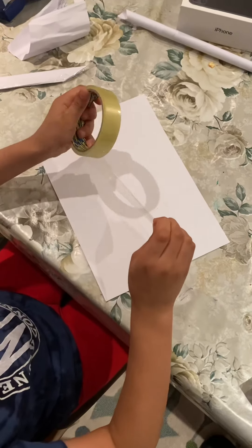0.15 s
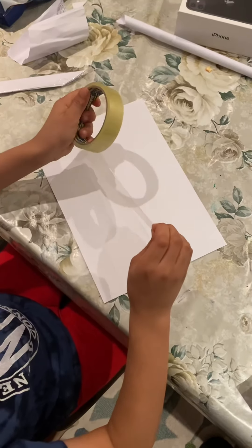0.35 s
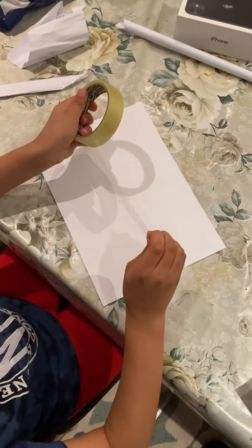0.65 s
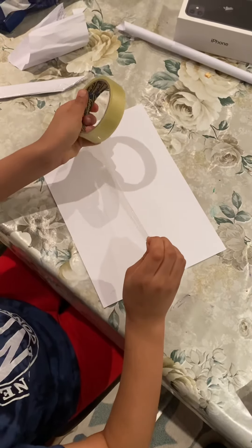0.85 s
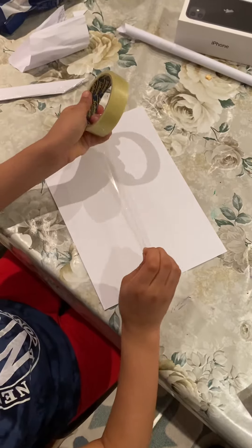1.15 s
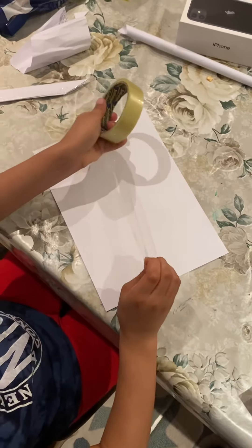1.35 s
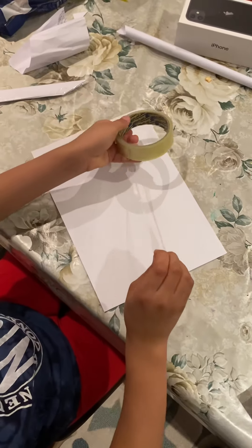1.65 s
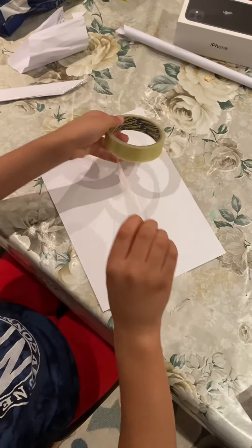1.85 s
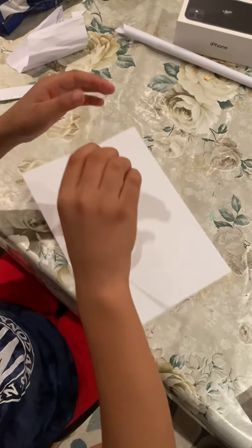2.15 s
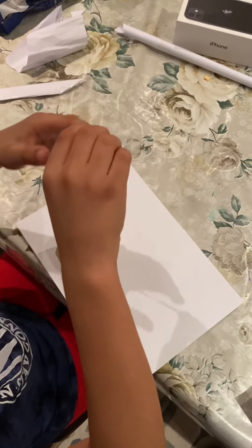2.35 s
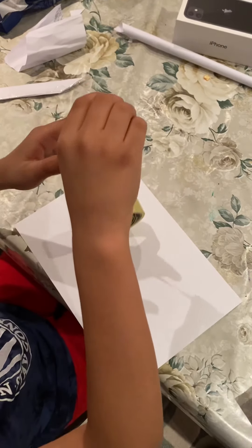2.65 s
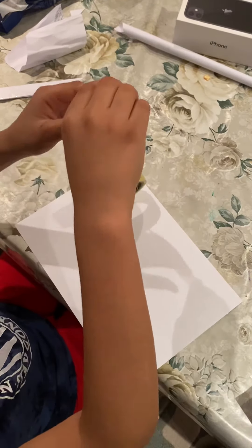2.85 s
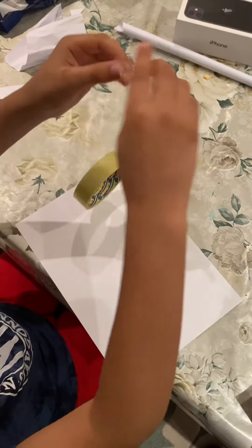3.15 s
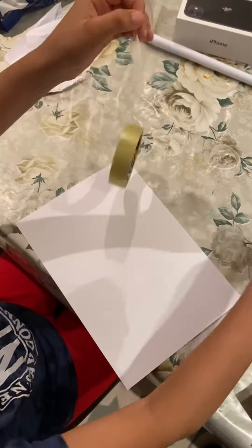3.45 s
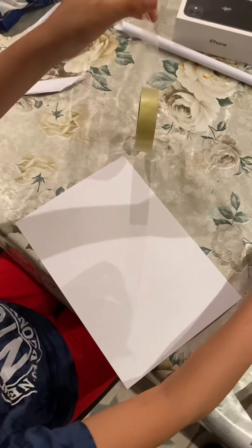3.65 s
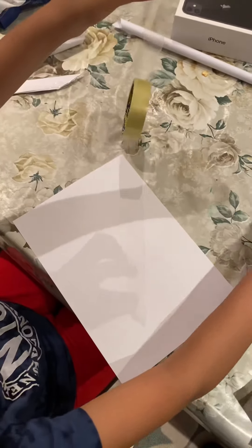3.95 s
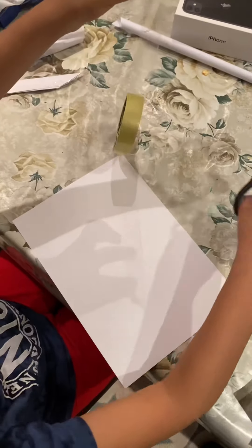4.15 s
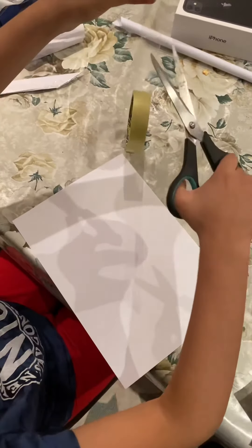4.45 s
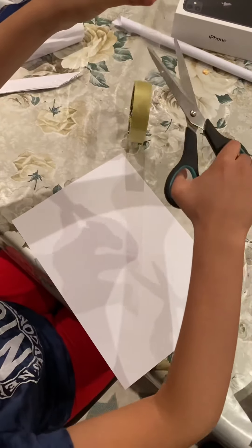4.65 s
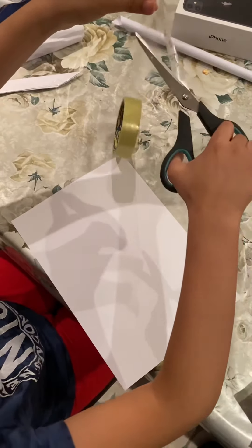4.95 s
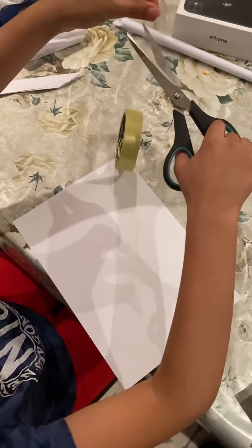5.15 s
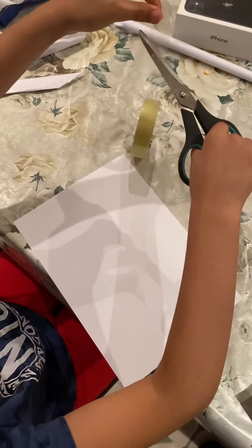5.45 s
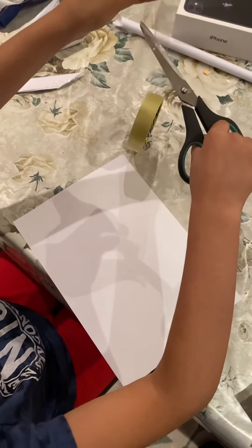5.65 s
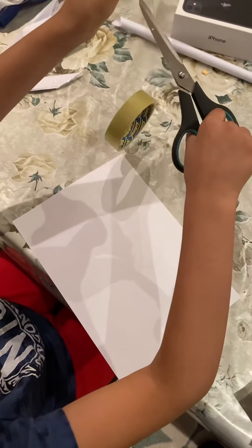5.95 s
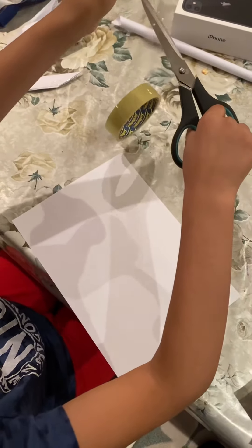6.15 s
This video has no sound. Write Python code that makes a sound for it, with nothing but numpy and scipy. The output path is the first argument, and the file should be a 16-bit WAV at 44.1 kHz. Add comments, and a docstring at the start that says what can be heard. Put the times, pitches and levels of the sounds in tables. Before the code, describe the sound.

Loud, jerky crackles of tape being unrolled, followed by a small bounce, light paper rustling and scattered clicks at a table indoors.

```python
"""Sticky tape is pulled off its roll above a table: for just over a second, stick-slip friction frees it
in short ripping jerks. The strip comes unstuck from a finger and rings, then the roll drops on a paper
sheet and bounces. Paper, sleeves and scissors rustle and click, with one soft knock on the table, and near
the end the strip is plucked twice more. All the while a quiet furnished room rumbles and hums, heard by
a nearby phone whose two microphone ports receive the treble at different delays."""
import sys
import numpy as np
from scipy import signal
from scipy.fft import rfft, irfft, next_fast_len
from scipy.io import wavfile
from scipy.ndimage import uniform_filter1d, map_coordinates

SR = 44100
rng = np.random.default_rng(int(sys.argv[2]) if len(sys.argv) > 2 else 0)


def to_wav(sig):
    """Store sig (one row per channel, or 1-D mono) as 16-bit WAV at the path in sys.argv[1].

    Samples outside -1..1 are clipped; the rate is SR.
    """
    pcm = np.clip(np.atleast_2d(sig), -1, 1) * 32767
    pcm = np.round(pcm).astype(np.int16)
    wavfile.write(sys.argv[1], SR, pcm.T)  # frames by channels


N = 277389
SPAN = N + SR  # samples, with a margin at both ends
EARLY_S, PAD = 0.2, 256  # margin before time zero; samples left ahead of each event for its filters
MS = np.arange(4096) / SR * 1000  # time within one event


def amp(db):
    """Amplitude ratio of a level in decibels."""
    return 10 ** (np.asarray(db) / 20)


def unit(x):
    """Normalisation to an rms of 1."""
    return x / np.sqrt(np.mean(x ** 2) + 1e-20)


def along(points, hz):
    """Interpolation of (freq_hz, value) points on a logarithmic axis."""
    freqs, values = np.transpose(points)
    return np.interp(np.log(hz + 1), np.log(freqs + 1), values)


def curves(rows):
    """Linear envelopes, one for each column after the time."""
    times, *columns = np.transpose(rows)
    return [np.interp(np.arange(N) / SR, times, column) for column in columns]


def wobble(rate_hz):
    """Random modulation: a spline through Gaussian knots."""
    knots = rng.standard_normal(int(N * rate_hz / SR) + 4)
    return map_coordinates(knots, [np.arange(N) * rate_hz / SR])


def filtered(x, response):
    """Linear filtering: the spectrum times a frequency response."""
    size = next_fast_len(N + SR // 2)
    return irfft(rfft(x, size) * response(np.fft.rfftfreq(size, 1 / SR)), size)[..., :N]


def resonances(modes):
    """Superposed resonators (pitch_hz, width_hz, gain_db) of alternating sign."""
    return lambda f: sum((-1) ** k * amp(db) * 1j * f * width / (hz * hz - f * f + 1j * f * width)
                         for k, (hz, width, db) in enumerate(modes))


def colour(points):
    """Zero-phase response through (freq_hz, gain_db) points."""
    return lambda f: amp(along(points, f))


# Likeness of the two ports in diffuse sound: freq_hz, coherence
DIFFUSE_FIELD = [(60, 0.98), (250, .9), (700, 0.12), (2000, 0.94), (3200, 0.39), (7000, 1), (9000, 1),
                 (10500, 1), (12000, 1), (13600, 0.96), (16000, .7)]

def stereo(pair, coherence=DIFFUSE_FIELD):
    """Partial coherence: two independent signals mix as mid and side into left and right."""
    angle = lambda hz: np.arccos(np.clip(along(coherence, hz), -1, 1)) / 2
    mid, side = filtered(pair, lambda hz: np.array([np.cos(angle(hz)), np.sin(angle(hz))]))
    return np.array([mid + side, mid - side])


# Low room noise, raised at first by the lingering low echo of the tape rips: time_s, rumble_db, low_db
ROOM_LEVELS = [(0.0, -64.5, -56), (0.47, -67, -57.5), (0.89, -80, -60), (1.55, -78.5, -68),
               (1.85, -62.5, -66), (2.4, -74, -67), (3.25, -73, -66.5), (3.4, -69.5, -66),
               (4.0, -68.5, -67.5), (4.4, -79.5, -67), (6.29, -78.5, -67.5)]
# Spectra of deep rumble, low room noise and microphone hiss: freq_hz, gain_db
RUMBLE_SPECTRUM = [(12, -56.5), (20, -28), (25, -12), (38, -4), (70, -4), (90, -0.5), (120, -30),
                   (200, -120)]
LOW_SPECTRUM = [(41, -30.5), (70, -5.5), (123, -3.5), (155, -4.5), (178, -6.5), (371, -13.5), (559, -21),
                (588, -32.5), (898, -32.5), (1500, -41.5), (1950, -77.5), (3300, -120)]
HISS_SPECTRUM = [(800, 9), (2000, -6.5), (6000, -8), (12000, -14), (16000, -15.5), (16500, -52.5)]
# A distant appliance: pitch_hz, level_db
HUM_PARTIALS = [(48.4, -72), (96.9, -72), (150.7, -72)]
# Swells of a low drone: time_s, level_db
DRONE_LEVELS = [(1.45, -82.5), (1.7, -61.5), (2.05, -55.5), (2.2, -66), (2.55, -70.5), (3.2, -85),
                (3.4, -58.5), (3.55, -70.5), (3.9, -81)]

def room_noise():
    """Diffuse field: coloured noise with a hum and a drone that drift in amplitude and phase."""
    t = np.arange(N) / SR
    rumble_db, low_db = curves(ROOM_LEVELS)
    noise = lambda spectrum: unit(filtered(rng.standard_normal((2, N)), colour(spectrum)))
    rumble = amp(rumble_db + 1.2 * wobble(3.9)) * noise(RUMBLE_SPECTRUM)
    low_noise = amp(low_db + 0.98 * wobble(19)) * noise(LOW_SPECTRUM)
    hum = sum(amp(db + 1.8 * wobble(1.9)) * np.sin(2 * np.pi * hz * t + 1.3 * wobble(1.6))
              for hz, db in HUM_PARTIALS)
    drone_db = curves(DRONE_LEVELS)[0] + 0.8 * wobble(5)
    drone = amp(drone_db) * np.sin(2 * np.pi * 58 * t + 1.5 * wobble(3.8))
    hiss = amp(-81) * noise(HISS_SPECTRUM)
    return stereo(rumble + low_noise + hiss) + hum + drone


# Decay of reflections from the table top and close things, and from the walls: freq_hz, t60_s
NEAR_DECAY = [(200, 0.23), (1500, 0.15), (5000, 0.08), (14000, 0.021)]
WALL_DECAY = [(200, 0.94), (1000, 0.62), (4000, 0.56), (14000, 0.22)]

def reflections(x, decay, delay_ms, hop_s=0.041):
    """Reverberation: each band decays exponentially; moving hands give every hop its own echo pattern."""
    out = np.zeros((2, SPAN + SR))
    hop, delay = round(hop_s * SR), round(delay_ms * SR / 1000)
    for start in range(0, SPAN, hop):
        part = x[start:start + hop]
        if np.abs(part).max() < 1e-5:
            continue
        hz, t, bands = signal.stft(rng.standard_normal((2, SR // 2)), SR, nperseg=256)
        tail = signal.istft(bands * amp(-60 * t / along(decay, hz)[:, None]), SR, nperseg=256)[1]
        wet = signal.fftconvolve(part[None], unit(tail) / np.sqrt(tail.shape[1]), axes=1)
        out[:, start + delay:][:, :wet.shape[1]] += wet
    return out[:, :SPAN]


# Paper and sleeves sliding: time_s, dull_db, bright_db
RUSTLE_LEVELS = [(1.3, -74.5, -69.5), (1.94, -71.5, -75.5), (2.04, -58.5, -61), (2.29, -68.5, -64.5),
                 (2.485, -80.5, -91.5), (2.5, -65, -67.5), (2.7, -71, -73), (3.55, -68, -73),
                 (3.68, -83, -87), (3.9, -81, -82), (4.29, -101, -96.5), (4.32, -82, -87),
                 (4.59, -82, -78.5), (4.7, -98, -91.5), (4.9, -94, -91), (4.92, -70, -64),
                 (5.16, -75.5, -73), (5.32, -67.5, -67), (5.48, -90, -94.5), (5.52, -81, -76),
                 (5.9, -97, -98), (6.29, -93, -90)]
# Their dull rub and bright hiss: freq_hz, gain_db
DULL_SPECTRUM = [(300, 9.5), (800, -5), (1500, -0.5), (3000, 4.5), (5500, 3), (9000, -24.5), (16000, -27)]
BRIGHT_SPECTRUM = [(1500, -41), (3000, -7), (6000, -2), (9000, 5), (12000, 2.5), (15700, -3), (16200, -45)]

def rustle(ticks_per_s=40, tick_db=13):
    """Sliding friction: fibres make clumps of noise in shifting patches of colour, with sparse ticks."""
    dull_db, bright_db = curves(RUSTLE_LEVELS)
    moving = np.arange(N) > RUSTLE_LEVELS[0][0] * SR
    bands = signal.stft(rng.standard_normal((2, N)), nperseg=256)[2]
    patches = uniform_filter1d(rng.standard_normal(bands.shape[1:]), size=4, axis=0)  # across frequency
    patches = uniform_filter1d(patches, size=14, axis=1)  # across time
    patchy = signal.istft(bands * amp(2.6 * unit(patches)), nperseg=256)[1][:, :N]
    ticks = (rng.random(N) < ticks_per_s / SR) * amp(tick_db + 3.9 * rng.standard_normal(N))
    clumps = amp(1.33 * wobble(5) + 0.86 * wobble(10) + 0.91 * wobble(170))
    grains = patchy * (clumps + ticks)
    dull = amp(dull_db) * unit(filtered(grains, colour(DULL_SPECTRUM)))
    bright = amp(bright_db) * unit(filtered(grains, colour(BRIGHT_SPECTRUM)))
    return stereo(moving * (dull + bright))


# A soft knock on the table; the roll landing on the sheet and bouncing: start_s, level_db
TABLE_KNOCKS = [(3.587, -35)]
ROLL_LANDINGS = [(2.003, -39.5), (2.094, -45)]
# Modes of the table and of the roll's core: pitch_hz, gain_db, t60_s
TABLE_MODES = [(115.6, -8, 0.19), (247.2, -3.5, 0.038), (470.6, 2, 0.028), (709, 6.5, 0.017)]
CORE_MODES = [(326, 8.5, 0.018), (458, 5, 0.023), (566, 8.5, 0.013)]

def thuds(strikes, modes, attack_s):
    """Free vibration: a soft impact excites modes that ring as damped sinusoids."""
    out, t = np.zeros(SPAN), np.arange(SR // 4) / SR
    tone = sum(amp(db - 60 * t / t60) * np.sin(2 * np.pi * hz * t) for hz, db, t60 in modes)
    onset = 1 - np.exp(-t / attack_s)
    for start_s, db in strikes:
        out[round((start_s + EARLY_S) * SR) + PAD:][:len(t)] += amp(db) * tone * onset
    return out


def add_volley(out, start_s, envelope, paths, spread_db=3.5):
    """Source and filter: tiny fractures of uneven size sound through each (level_db, response) path."""
    cracks = rng.standard_normal((2, len(MS)))  # two rows, as the contact is a line
    cracks *= amp(spread_db * rng.standard_normal(len(MS)))
    force = rfft(np.roll(envelope * cracks, PAD, axis=1))
    hz = np.fft.rfftfreq(len(MS), 1 / SR)
    for db, response in paths:
        sound = irfft(force * response(hz), len(MS))
        gain = amp(db) * np.linalg.norm(envelope) / np.linalg.norm(sound, axis=1, keepdims=True)
        out[:, round((start_s + EARLY_S) * SR):][:, :len(MS)] += gain * sound


def snap(length_ms, rise_ms, sag, fade_ms, overshoot=0):
    """Transient envelope: a sudden rise with optional overshoot, a sagging hold, an exponential end."""
    rise = 1 - np.exp(-MS / rise_ms)
    hold = np.exp(-sag * np.minimum(MS / length_ms, 1))
    fade = np.exp(-np.maximum(MS - length_ms, 0) / fade_ms)
    return rise * hold * fade * (1 + overshoot * np.exp(-MS / 0.7))


# A hard contact: freq_hz, gain_db
CLICK_SPECTRUM = [(500, -26.5), (1000, -6), (1600, -9.5), (2500, -1), (3600, -2), (5000, 3.5), (7000, 0.5),
                  (15700, 0), (17000, -35.5)]

def tilted(db_per_octave):
    """Spectral tilt: a broadband click made brighter or duller about 5 kHz."""
    return lambda f: amp(along(CLICK_SPECTRUM, f) + db_per_octave * np.log2(np.clip(f, 1800, 14000) / 5000))


# Short rubs: start_s, level_db, tilt_db_per_octave, knock_gain_db, length_ms, body_hz, body_gain_db
RUBS = [(1.99, -51.5, -5, -16, 31, 2030, -3), (2.016, -45, -3, -37, 32, 3640, -9),
        (2.078, -50, 6, -16, 24, 5100, -5), (2.09, -54.5, 3, -10, 20, 1900, -2.5),
        (2.545, -50.5, -3.5, -4.5, 41.6, 1523, -9), (3.011, -60, -10, -18, 25, 3060, -4),
        (3.122, -53, -6, -12.5, 36, 4510, -8), (3.855, -66.5, -7, -4.5, 23, 5050, -7),
        (3.873, -62.5, -1, -4.5, 32.5, 2175, -4), (4.395, -60, 8.5, -26, 51.3, 2290, 1),
        (4.93, -56, 10, -28, 83, 5000, -9), (5.08, -48, 0.2, -20.5, 23.4, 7000, -6),
        (5.095, -53, 4, -5.5, 13.3, 3880, -3), (5.315, -47, 5, -31, 27, 2490, -6)]
# The roll in the hand: pitch_hz, width_hz, gain_db
ROLL_MODES = [(239.6, 53, -3), (440, 500, -3), (719, 280, -0.5), (952.2, 51, 1.5)]

def scuffs(peak_share=0.35, fade_share=0.25):
    """Frictional excitation: a rub swells and stutters, driving resonances of the rubbed body and roll."""
    out = np.zeros((2, SPAN))
    for start_s, db, tilt, knock_db, length_ms, body_hz, body_db in RUBS:
        progress = MS / length_ms
        swell = np.minimum(progress / peak_share, 1) ** 1.6
        fade = np.exp(-np.maximum(progress - peak_share, 0) / fade_share)
        stutter = amp(4 * unit(uniform_filter1d(rng.standard_normal(len(MS)), size=60)))  # grip and release
        body = resonances([(body_hz, 0.16 * body_hz, 0)])
        paths = (db, tilted(tilt)), (db + body_db, body), (db + knock_db, resonances(ROLL_MODES))
        add_volley(out, start_s, swell * fade * stutter, paths)
    return out


# Contacts of tape, paper and scissors: start_s, level_db, tilt_db_per_octave
CONTACTS = [(1.4652, -45.5, -3.5), (2.0031, -38, -10), (2.0234, -34, 2.5), (2.029, -30, 6),
            (2.4985, -50, -3), (2.5598, -38, -1.5), (2.922, -49.5, -7), (2.9498, -52.5, -16.5),
            (3.0133, -41, -7.5), (3.1351, -36, 3), (3.4186, -43, -5), (3.459, -45, 4), (3.5475, -47, -9.5),
            (3.7103, -48, 1), (3.9561, -50.5, 4), (4.0991, -58, -3), (4.306, -60.5, -6.5),
            (4.415, -47, 5.5), (4.7857, -49, 2), (4.803, -48, -5), (4.914, -65, 2.2), (5.053, -45.5, 2),
            (5.089, -41.5, -1.5), (5.1715, -49, -11.5), (5.2112, -42.5, 11), (5.2465, -51.5, 7),
            (5.2768, -47, -1.3), (5.285, -49, 5), (5.297, -40.5, -3.5), (5.3122, -27.5, -1.3),
            (5.3313, -35, -6), (5.534, -45.5, 14), (5.7329, -48.5, -6.1), (5.968, -57, -4.5)]
# The strip comes unstuck from a finger: start_s, level_db, tilt_db_per_octave, ring_gain_db
STRIP_PLUCKS = [(1.6258, -24, 3.5, -2), (5.5716, -34.5, -2, -5), (6.2363, -25, -1.5, -7)]
# The stretched strip near the peel line: pitch_hz, width_hz, gain_db
FILM_MODES = [(2477, 470, 8.5), (5700, 700, 8.5)]

def clicks(contact_ring_db=-15.5):
    """Impulsive excitation: a brief contact or pluck clicks, rings the strip and knocks the roll."""
    out = np.zeros((2, SPAN))
    envelope = snap(1.5, rise_ms=0.14, sag=1.2, fade_ms=0.99)
    for start_s, db, tilt, ring_db in [(*row, contact_ring_db) for row in CONTACTS] + STRIP_PLUCKS:
        knock_db = -62 + 0.4 * (db + 42)  # grows more slowly than the click
        paths = (db, tilted(tilt)), (db + ring_db, resonances(FILM_MODES)), (knock_db, resonances(ROLL_MODES))
        add_volley(out, start_s, envelope, paths)
    return out


# Ticks of the glue edge: start_s, level_db
GLUE_TICKS = [(0.593, -34), (.622, -51.5), (.632, -44.5), (0.639, -34.5), (1.0146, -34), (1.021, -44.5),
              (1.029, -48), (1.042, -41)]

def glue_ticks():
    """Acoustic emission: the loaded glue edge ticks just before it lets go."""
    out = np.zeros((2, SPAN))
    envelope = snap(0.4, rise_ms=0.15, sag=0.3, fade_ms=0.6)
    for start_s, db in GLUE_TICKS:
        add_volley(out, start_s, envelope, [(db, tilted(4))])
    return out


# Slips of the peel front, the first heard only as its echo: start_s, level_db, length_ms
PEEL_SLIPS = [(-0.15, -5.5, 15), (0.019, -18, 5.5), (0.0307, -18, 2), (0.0337, -20, 5.7),
              (0.0459, -13, 4.2), (0.0594, -19, 7.6), (0.0745, -10.5, 3.1), (0.079, -17.5, 2.3),
              (0.0878, -15, 5.9), (0.1445, -17, 3.8), (0.2314, -15.5, 3.8), (0.2353, -17.5, 6.1),
              (0.2418, -17.5, 1.9), (0.2456, -16, 2.7), (0.2494, -18, 2.8), (0.3272, -16, 5),
              (0.3386, -10, 2.7), (0.4336, -12.5, 2.13), (0.4369, -15, 1.24), (0.4449, -16, 2.6),
              (0.6498, -14.5, 1.8), (0.6529, -14.5, 2.17), (0.6598, -14, 4.4), (0.8279, -15, 2.9),
              (0.8408, -12, 2.1), (1.0707, -16, 1.7), (1.0735, -14.5, 3.3), (1.0845, -12.5, 0.53),
              (1.0977, -12, 1.23), (1.171, -16.5, 2.35)]
# Cracking glue: freq_hz, gain_db
CRACK_SPECTRUM = [(700, -44.5), (1500, -14), (2200, -3.5), (3500, -4.5), (7000, 0), (11000, -3),
                  (15700, -2.5), (17000, -29.5)]
# The free length of strip: pitch_hz, width_hz, gain_db
STRIP_MODES = [(1060, 620, -2), (1545, 400, 0.9)]

def tape_peel(sink_per_s=0.089, grow_s=0.12):
    """Stick-slip: each slip cracks the glue, rings the lengthening strip and jerks the roll and hand."""
    out = np.zeros((2, SPAN))
    hand = resonances([(140, 90, 0)])
    for start_s, db, length_ms in PEEL_SLIPS:
        # tension differs at each slip
        film = [(hz * (1 + 0.034 * rng.standard_normal()), width, gain) for hz, width, gain in FILM_MODES]
        rip = lambda f: colour(CRACK_SPECTRUM)(f) * (1 + resonances(film)(f))
        # a longer strip rings lower and louder
        strip = resonances([(hz * (1 - sink_per_s * start_s), width, gain) for hz, width, gain in STRIP_MODES])
        strip_db = -7.5 - 20 * np.exp(-max(start_s, 0) / grow_s)
        paths = (db, rip), (db + strip_db, strip), (db - 18, resonances(ROLL_MODES)), (db - 30, hand)
        envelope = snap(length_ms, rise_ms=0.3, sag=0.9, fade_ms=1.2, overshoot=2.2)
        add_volley(out, start_s, envelope, paths, spread_db=4.5)
    return out


# Likeness of the two ports in direct sound: freq_hz, coherence
DIRECT_FIELD = [(60, 1), (1000, 1), (3200, .85), (8000, 0.98), (16000, .85)]

def scene():
    """Superposition of direct sound, near and far reflections, rustle and room noise."""
    direct = tape_peel() + glue_ticks() + clicks() + scuffs()
    direct += thuds(TABLE_KNOCKS, TABLE_MODES, attack_s=0.0037)
    direct += thuds(ROLL_LANDINGS, CORE_MODES, attack_s=0.0018)
    wet = amp(-9) * reflections(direct[0], NEAR_DECAY, delay_ms=2.2)
    wet += amp(-17) * reflections(direct[0], WALL_DECAY, delay_ms=8)
    start = round(EARLY_S * SR) + PAD
    heard = slice(start, start + N)
    return stereo(direct[:, heard], DIRECT_FIELD) + stereo(wet[:, heard]) + rustle() + room_noise()


# Phase of the left port ahead of the right: freq_hz, lead_rad
PORT_PHASE = [(0, 0), (2600, .1), (4300, 1.2), (5000, .2), (7500, 3.14), (10300, 6.28), (13600, 9.42),
              (16600, 12.6)]
# Level of the left port over the right: freq_hz, difference_db
PORT_BALANCE = [(60, -0.47), (600, -3.5), (1500, 0.5), (2900, -1.5), (5000, 0), (16000, -0.5)]

def record(dry, ceiling=0.95, top_hz=17097):
    """Phase and level differences between the ports, then soft saturation and a band limit."""
    freqs, lead = np.transpose(PORT_PHASE)
    side = np.array([[0.5], [-0.5]])
    ports = lambda hz: np.exp(1j * side * np.interp(hz, freqs, lead)) * amp(side * along(PORT_BALANCE, hz))
    heard = filtered(dry, ports)
    rounded = heard / (1 + np.abs(heard / ceiling) ** 6) ** (1 / 6)
    return filtered(rounded, lambda hz: hz < top_hz)


dry = scene()
out = record(dry)
to_wav(out)
```